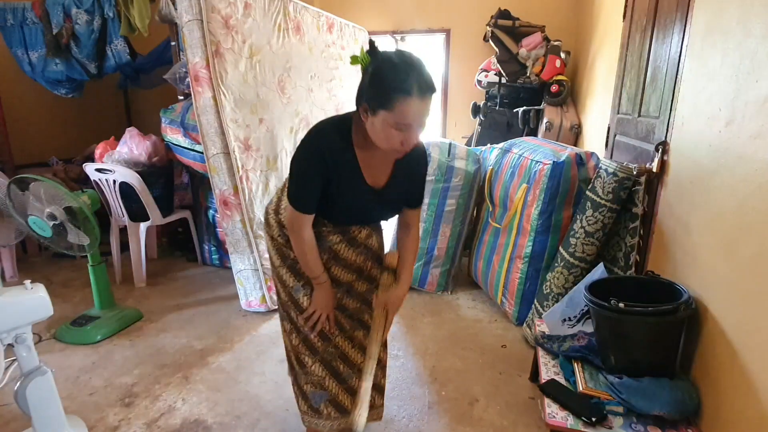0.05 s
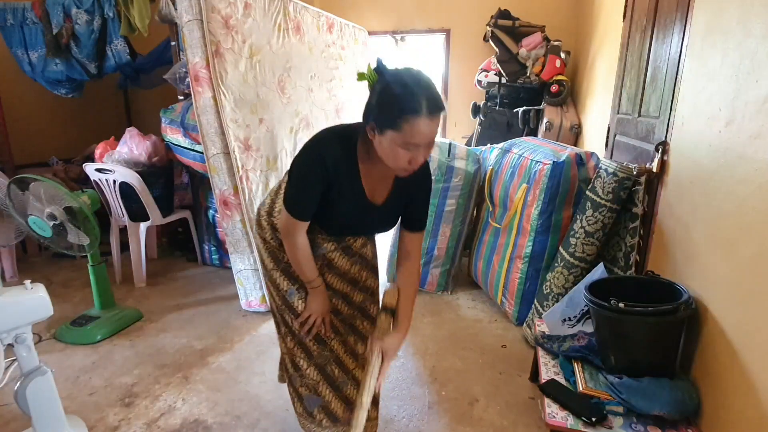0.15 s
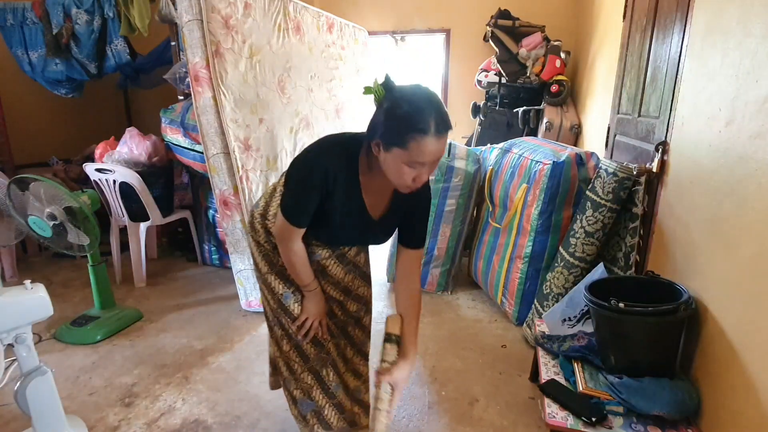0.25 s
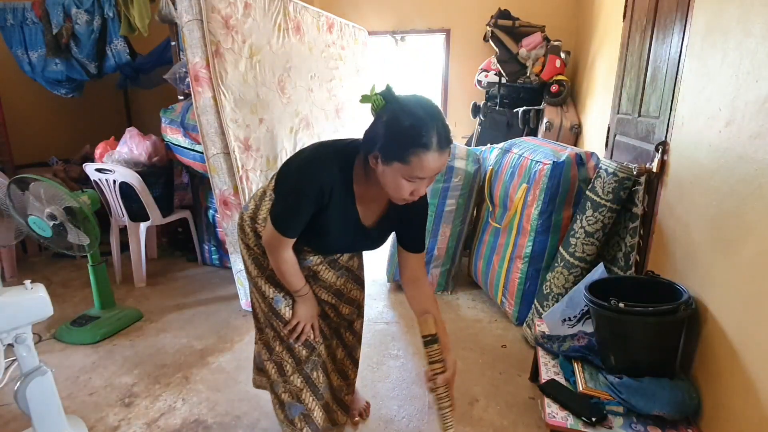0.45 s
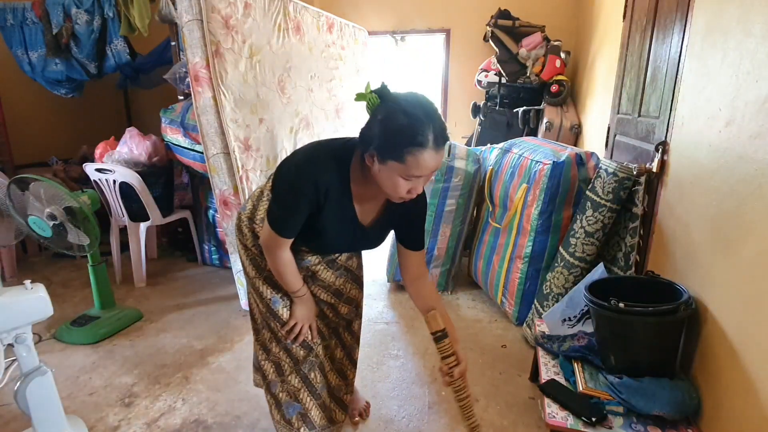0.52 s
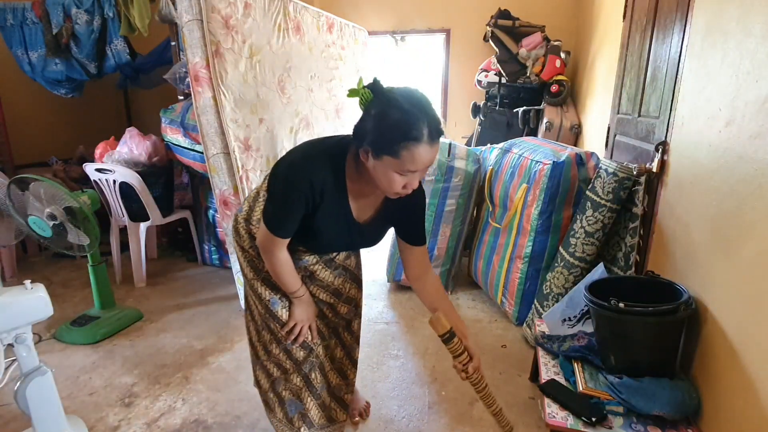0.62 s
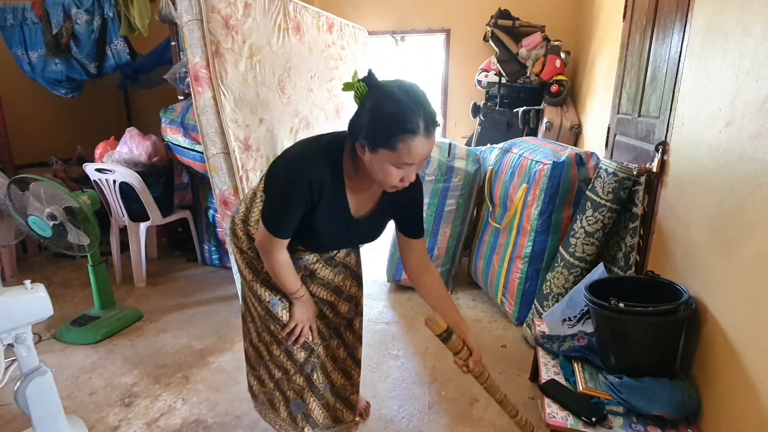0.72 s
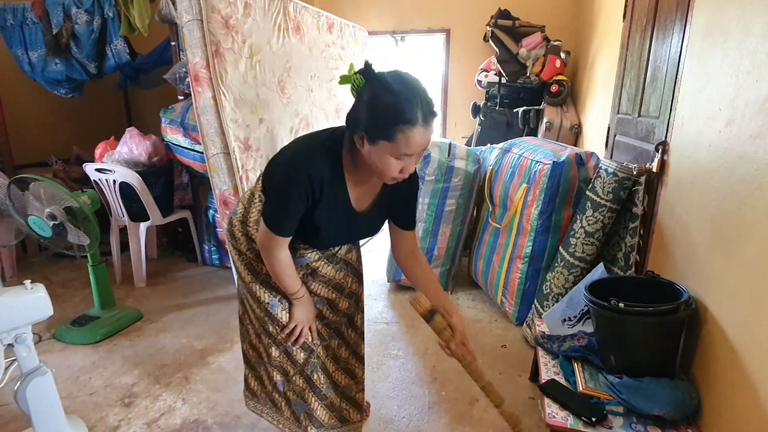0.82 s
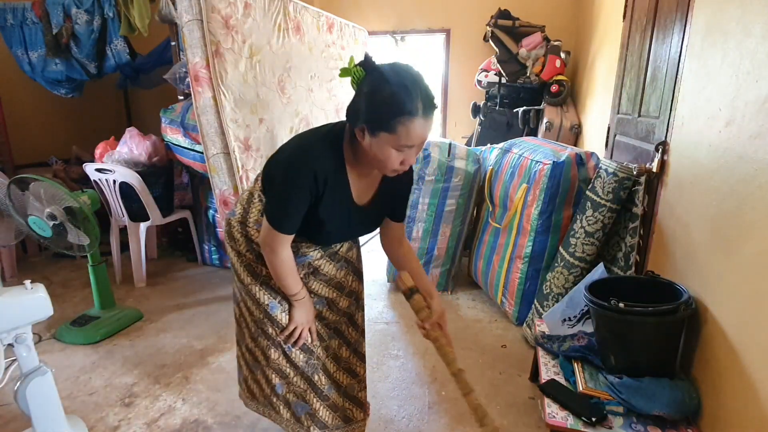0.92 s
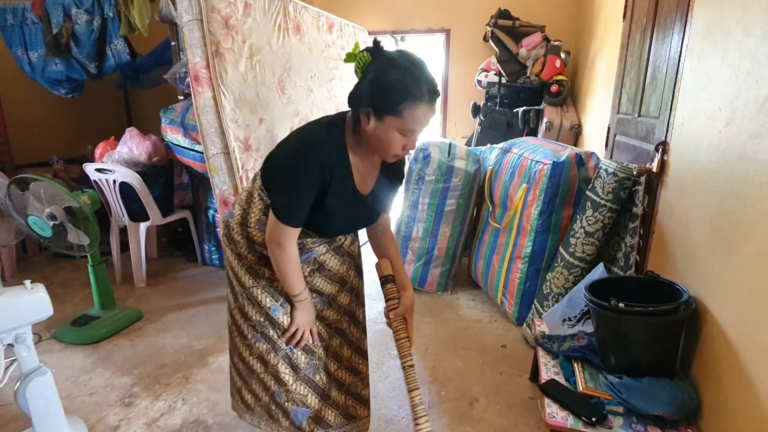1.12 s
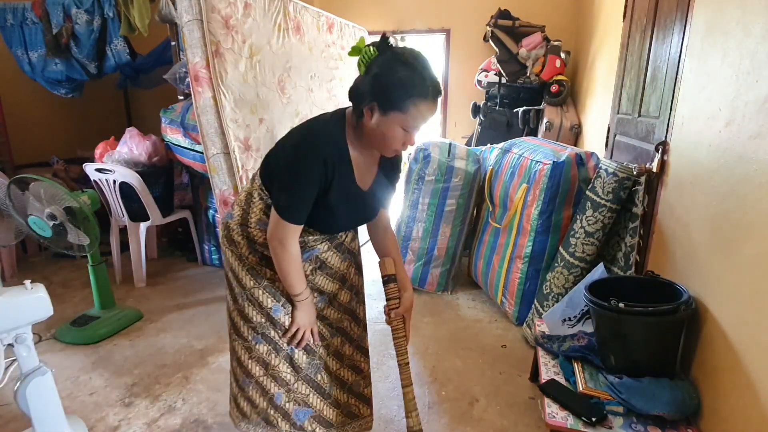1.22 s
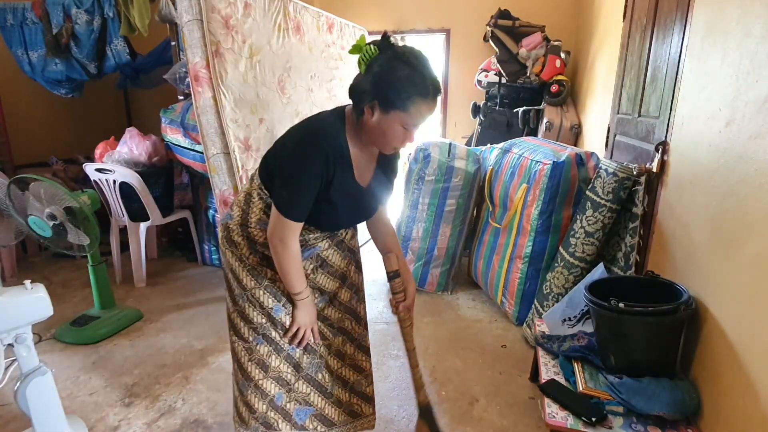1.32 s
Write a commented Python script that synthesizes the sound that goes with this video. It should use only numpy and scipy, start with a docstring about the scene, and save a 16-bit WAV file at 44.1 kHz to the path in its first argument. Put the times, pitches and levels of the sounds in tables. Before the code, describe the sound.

Broom swishing once over concrete in an echoing room, then trailing off in faint scratchy brushes.

```python
"""A hard-walled room with a bare concrete floor; a grass broom sweeps a little right of the microphones.
The head brushes in, lands in one heavy swish, then drags on lightly. Countless tiny slips make the
bundle rustle low, the stalks scrape and the fine tips hiss. Single stalks catch and tick, grit is
flicked along, a foot scuffs softly, the head bumps and bears on the floor, and the room rings on
over faint still air."""
import sys
import numpy as np
from scipy import signal
from scipy.fft import rfft, irfft
from scipy.io import wavfile

SR = 44100
rng = np.random.default_rng(int(sys.argv[2]) if len(sys.argv) > 2 else 0)


def materialize(psi):
    """Save the field psi as 16-bit PCM at rate SR to the path in sys.argv[1].

    A 1-D psi becomes a single channel; in a 2-D psi each row is a channel.
    """
    bounded = np.clip(np.atleast_2d(psi).T, -1, 1)
    quanta = np.round(bounded * 32767).astype(np.int16)
    wavfile.write(sys.argv[1], SR, quanta)


N = 59535
T = np.arange(N) / SR
HZ = np.fft.rfftfreq(2 * N, 1 / SR)
BROOM_LAG_S, ROOM_LAG_S = 0.0004477, 0.000352  # left behind right


# Friction spectra: f/Hz, gain/dB
BUNDLE_SPECTRUM = [(30, -22), (70, 2), (110, -12.5), (170, -4.5), (240, -5), (370, 2.5), (520, 2),
                   (700, -0.5), (950, -7.5), (2000, -35)]
STALK_SPECTRUM = [(300, -35), (700, -2.5), (1000, -1.5), (1350, 2), (1600, 0.5), (1850, 1), (2400, -1),
                  (3100, -7.5), (4200, -9), (8000, -31.5)]
TIP_SPECTRUM = [(1200, -23), (3000, 4.5), (4200, 0), (5400, 2), (7400, 1.5), (8800, -7.5), (10500, -33),
                (15500, -32)]
FIZZ_SPECTRUM = [(5000, -33), (8500, -6), (9800, -2), (11800, 0), (13500, -3.5), (15500, -4)]
# Envelopes along the sweep: t/s, relative level/dB
BUNDLE_ENVELOPE = [(0, -43), (0.165, -42), (0.215, -37.5), (0.312, -42.5), (0.338, -23), (0.38, -21.5),
                   (0.42, -24), (0.52, -31.5), (0.62, -45), (0.672, -34), (0.76, -49), (0.91, -41),
                   (0.965, -51.5), (1.06, -40.5), (1.2, -59.5), (1.35, -54)]
STALK_ENVELOPE = [(0, -43.5), (0.1, -49), (0.245, -34), (0.295, -38.5), (0.372, -20.5), (0.45, -26),
                  (0.6, -42), (0.675, -39), (0.79, -48), (0.89, -44.5), (0.965, -50), (1.01, -45),
                  (1.2, -61), (1.35, -52)]
TIP_ENVELOPE = [(0, -53.5), (0.1, -56.5), (0.165, -47.5), (0.23, -41.5), (0.295, -42.5), (0.378, -30.5),
                (0.44, -32.5), (0.59, -47), (0.665, -43), (0.74, -52), (0.82, -48.5), (0.95, -52),
                (1.01, -46), (1.15, -64.5), (1.275, -66.5), (1.35, -61)]
FIZZ_ENVELOPE = [(0, -58), (0.1, -57.5), (0.165, -47), (0.24, -44), (0.3, -48), (0.38, -32.5),
                 (0.44, -37.5), (0.58, -50), (0.65, -47.5), (0.75, -52), (0.93, -55.5), (1.0, -49.5),
                 (1.15, -70.5), (1.27, -73), (1.35, -64.5)]

def broom():
    """Grass dragged over concrete: low rustle of the bundle, scrape of stalks, hiss and fizz of tips."""
    bundle = friction(BUNDLE_ENVELOPE, BUNDLE_SPECTRUM, slips_per_s=1200, spread_db=1.5,
                      clump_db=0.8, clump_hz=60, blur=0.61)
    stalks = friction(STALK_ENVELOPE, STALK_SPECTRUM, slips_per_s=1100, spread_db=3,
                      clump_db=1.15, clump_hz=110, blur=0.68)
    tips = friction(TIP_ENVELOPE, TIP_SPECTRUM, slips_per_s=3000, spread_db=3.5,
                    clump_db=0.83, clump_hz=120, blur=0.84)
    fizz = friction(FIZZ_ENVELOPE, FIZZ_SPECTRUM, slips_per_s=4000, spread_db=1.5,
                    clump_db=1.3, clump_hz=120, blur=0.99)
    return amp(-0.5) * bundle + amp(1.0) * stalks + amp(0.55) * tips + amp(-0.23) * fizz


# Direct sound: f/Hz, left-right coherence
BROOM_COHERENCE = [(100, 1), (700, 0.91), (2000, 0.77), (4000, 0.48), (8000, 0.083), (14000, .1)]

def friction(envelope, spectrum, slips_per_s, spread_db, clump_db, clump_hz, blur):
    """Tiny slips of random size over the blur of countless finer ones, swelling in clumps."""
    sizes = amp(spread_db * np.minimum(rng.exponential(1, (2, N)), 3))
    signs = rng.choice([-1, 1], (2, N))
    slips = sizes * signs * (rng.random((2, N)) < slips_per_s / SR)
    clump_spectrum = rfft(rng.standard_normal(2 * N)) * np.exp(-(HZ / clump_hz) ** 2)
    clumps = unit_rms(irfft(clump_spectrum)[:N])
    drive = (unit_rms(slips) + blur * rng.standard_normal((2, N))) * amp(clump_db * clumps)
    rubbing = stereo(colour(drive, curve(spectrum)), BROOM_COHERENCE, BROOM_LAG_S)
    return unit_rms(rubbing) * amp(np.interp(T, *np.transpose(envelope)))


# Stalk ticks: t/s, relative level/dB, ring f/Hz
STALK_TICKS = [(0.062, -27, 2000), (0.254, -14, 2070), (0.289, -15, 2110), (0.305, -25, 2570),
               (0.334, -8, 2000), (0.368, -1, 2230), (0.671, -13, 1900), (0.886, -21, 2580),
               (0.914, -27, 2180), (0.989, -23, 1790), (1.005, -13.5, 1710), (1.012, -16.5, 1530),
               (1.034, -21.5, 1580)]
# Grit flicks, head bumps: t/s, relative level/dB
GRIT_FLICKS = [(0.76, -20.5), (0.817, -23.5), (0.83, -29), (0.885, -36), (0.899, -23.5), (1.076, -33),
               (1.309, -40)]
HEAD_BUMPS = [(0.036, -45), (0.334, -19), (0.351, -4), (0.376, -2.5), (0.404, -11), (0.669, -24),
              (1.035, -22)]
# Their spectra: f/Hz, gain/dB
GRIT_SPECTRUM = [(1500, -14), (4300, 8), (7000, -1), (9000, -19), (13000, 1.5), (15500, -11)]
BUMP_SPECTRUM = [(40, -20), (100, -10), (250, -16), (400, 0), (700, -9), (1200, -12), (4000, -50)]

def contacts():
    """Stalks catch and spring free, grit is flicked over the concrete, the head bumps the floor."""
    ticks = sum(impact(t, db, resonance_db(hz, width_oct=0.43), decay_s=0.0018, scuff=1.0)
                for t, db, hz in STALK_TICKS)
    grit = sum(impact(t, db, curve(GRIT_SPECTRUM), decay_s=0.0015, scuff=0.44) for t, db in GRIT_FLICKS)
    bumps = sum(impact(t, db, curve(BUMP_SPECTRUM), decay_s=0.0014, scuff=0.17) for t, db in HEAD_BUMPS)
    return amp(-11.5) * stereo(ticks + grit + bumps, BROOM_COHERENCE, BROOM_LAG_S)


def impact(start_s, level_db, spectrum_db, decay_s, scuff):
    """One short contact: a snap and a quickly dying scuff."""
    decay = (T >= start_s) * np.exp(-np.maximum(T - start_s, 0) / decay_s)
    drive = scuff * rng.standard_normal((2, N)) * decay
    drive[:, round(start_s * SR)] += 1  # snap
    hit = colour(drive, spectrum_db)
    unit_energy = hit / np.linalg.norm(hit, axis=1, keepdims=True)
    return amp(level_db) * unit_energy * np.sqrt(SR / 1000)  # level taken over 1 ms


# Whumps: peak t/s, rise/s, fall/s, relative level/dB, centre f/Hz
LOW_WHUMPS = [(0.035, 0.052, 0.041, -40, 225), (0.23, 0.041, 0.15, -37, 240), (0.37, 0.03, 0.1, -30, 99),
              (0.45, 0.026, 0.07, -36, 146), (1.03, 0.056, 0.038, -54, 90)]

def whumps():
    """Soft low swells: a foot scuffs, then the broom head bears on the floor."""
    out = 0
    for peak_s, rise_s, fall_s, db, hz in LOW_WHUMPS:
        width_s = np.where(T < peak_s, rise_s, fall_s)
        swell = amp(db) * np.exp(-((T - peak_s) / width_s) ** 2 / 2)
        rumble = colour(rng.standard_normal((2, N)), resonance_db(hz, width_oct=0.92))
        out = out + swell * unit_rms(rumble)
    return stereo(out, BROOM_COHERENCE, BROOM_LAG_S)


# Reverberation: f/Hz, T60/s
ROOM_DECAY = [(60, 0.44), (170, 0.49), (500, 0.86), (2000, 0.87), (5000, 0.53), (14000, 0.47)]
# Diffuse sound: f/Hz, left-right coherence
ROOM_COHERENCE = [(60, 1), (200, 1), (400, 0.64), (800, 0.41), (2000, 0.4), (4000, 0.22), (12000, 0.16)]

def room(direct, patterns=4, wander_hz=6, onset_s=0.0097):
    """Bare walls ring, longest in the mids; the moving broom trades one reflection pattern for another."""
    cycles = wander_hz * T + np.arange(patterns)[:, None] / patterns
    crossfades = np.maximum(np.cos(2 * np.pi * cycles), 0)
    out = 0
    for crossfade in crossfades:
        hz, t, noise = signal.stft(rng.standard_normal((2, N)), SR, nperseg=256)
        decay = amp(-60 * t / curve(ROOM_DECAY, hz)[:, None])
        tail = signal.istft(noise * decay, SR, nperseg=256)[1][:, :N]
        tail = tail * np.minimum(T / onset_s, 1)
        tail = tail / np.linalg.norm(tail[0])
        out = out + signal.fftconvolve(direct[1:] * crossfade, tail, axes=1)[:, :N]
    return stereo(out, ROOM_COHERENCE, ROOM_LAG_S)


# Still air: f/Hz, gain/dB
AIR_SPECTRUM = [(20, -1), (65, -10.5), (130, 4), (220, -2), (450, -8.5), (900, -4.5), (2000, -25),
                (4000, -44), (9000, -49), (15500, -39)]

def air(level_db=-50):
    """Faint steady background of the house."""
    noise = colour(rng.standard_normal((2, N)), curve(AIR_SPECTRUM))
    return amp(level_db) * unit_rms(stereo(noise, ROOM_COHERENCE, ROOM_LAG_S))


def amp(db):
    """dB to gain."""
    return 10 ** (np.asarray(db) / 20)


def unit_rms(x):
    """Scales to rms 1."""
    return x / np.sqrt(np.mean(x ** 2) + 1e-20)


def curve(table, hz=HZ):
    """Interpolates a table over log frequency."""
    table_hz, values = np.transpose(table)
    return np.interp(np.log(hz + 1), np.log(table_hz + 1), values)


def resonance_db(centre_hz, width_oct):
    """Gain curve of a broad resonance."""
    return -22 * np.log10(1 + (np.log2((HZ + 1) / centre_hz) / width_oct) ** 2)


def colour(x, gain_db):
    """Minimum-phase filter with the given gain curve."""
    log_gain = np.log(amp(gain_db))
    mirrored = np.concatenate([log_gain, log_gain[-2:0:-1]])
    response = np.exp(np.conj(signal.hilbert(mirrored)))[:N + 1]
    return irfft(rfft(x, 2 * N) * response)[..., :N]


def stereo(two_signals, coherence, lag_s):
    """Blends two signals into a partly coherent pair, left delayed."""
    right, other = rfft(two_signals, 2 * N)
    shared = np.clip(curve(coherence), -1, 1)
    left = (shared * right + np.sqrt(1 - shared ** 2) * other) * np.exp(-2j * np.pi * HZ * lag_s)
    return irfft(np.array([left, right]))[:, :N]


def scene():
    """Broom and contacts with their reverberation, plus dry whumps and air."""
    direct = broom() + contacts()
    return direct + amp(-4) * room(direct) + amp(-2.5) * whumps() + air()


# Microphone balance: f/Hz, left minus right/dB
MIC_BALANCE = [(60, -3), (200, -1.5), (380, -0.5), (700, -0.5), (1300, 0.5), (2400, 2), (4400, -1),
               (8100, 1.5), (10000, -7.5), (15000, -6.5)]
MIC_HISS_DB, MIC_CUTOFFS_HZ = -63.5, (15150, 15600)

def record(dry):
    """Two microphones, each with its own colour, faint hiss and band limit."""
    tilt_db = curve(MIC_BALANCE) / 2
    tinted = irfft(rfft(dry, 2 * N) * amp([tilt_db, -tilt_db]))[:, :N]
    hiss = amp(MIC_HISS_DB) * rng.standard_normal((2, N))
    low_pass = np.array([signal.firwin(511, hz, window=("kaiser", 9), fs=SR) for hz in MIC_CUTOFFS_HZ])
    return signal.oaconvolve(tinted + hiss, low_pass, "same", axes=1)


dry = scene()
out = record(dry)
materialize(out)
```